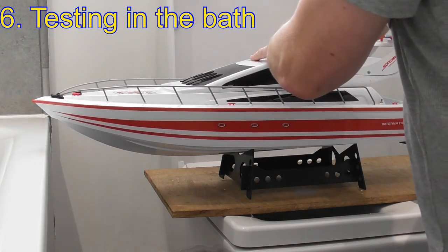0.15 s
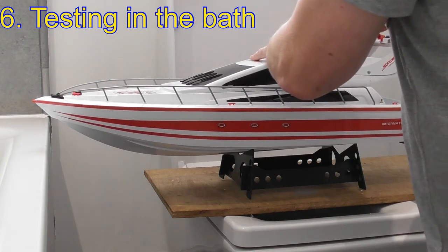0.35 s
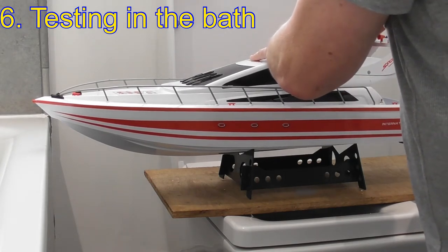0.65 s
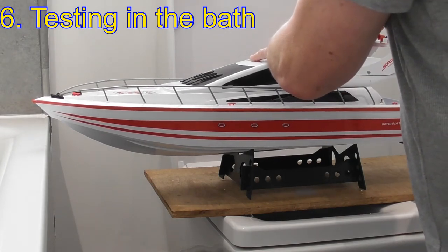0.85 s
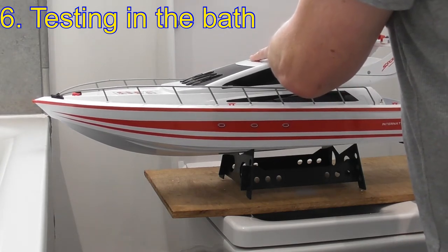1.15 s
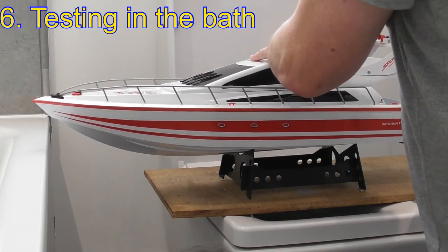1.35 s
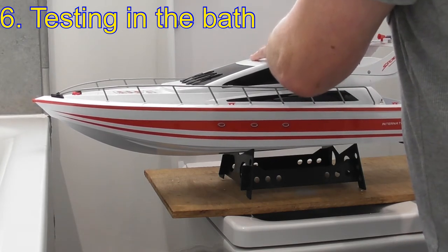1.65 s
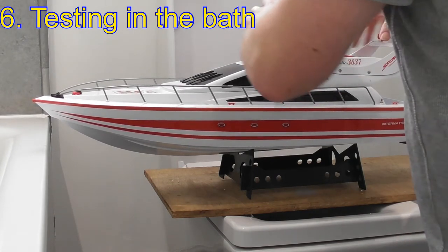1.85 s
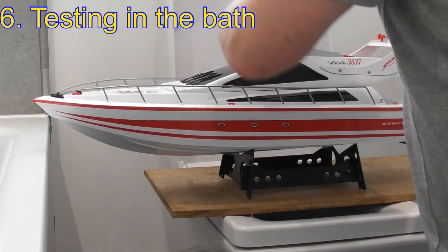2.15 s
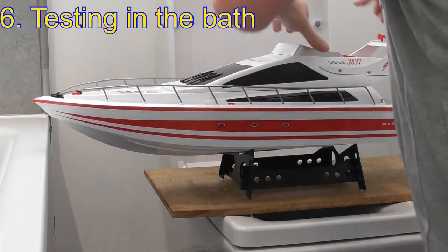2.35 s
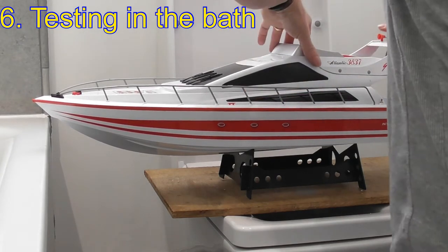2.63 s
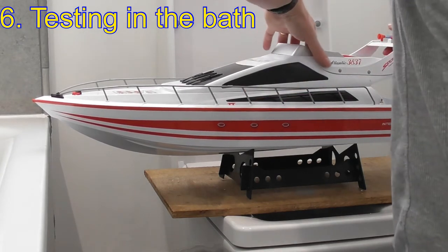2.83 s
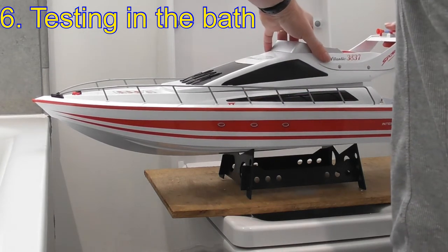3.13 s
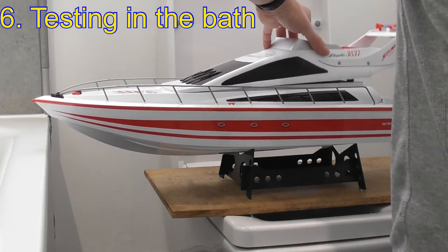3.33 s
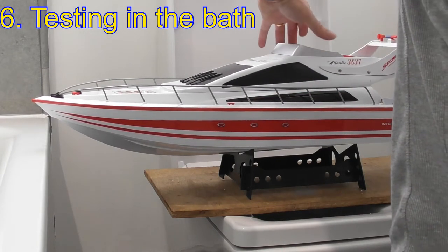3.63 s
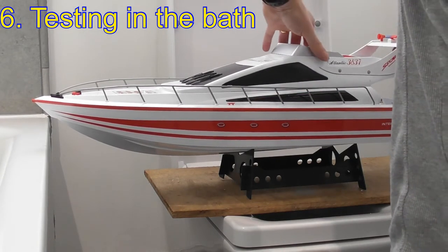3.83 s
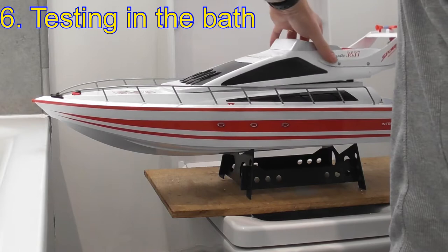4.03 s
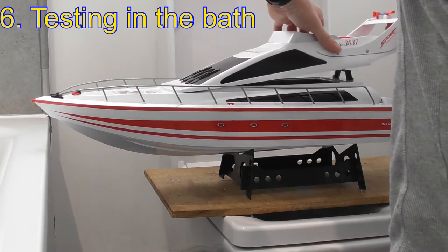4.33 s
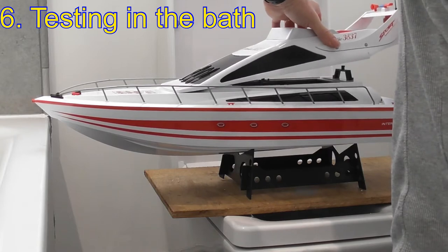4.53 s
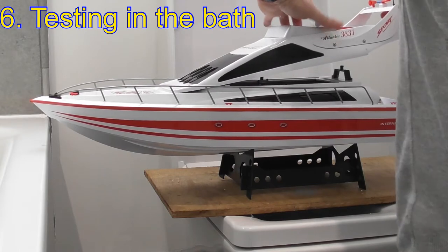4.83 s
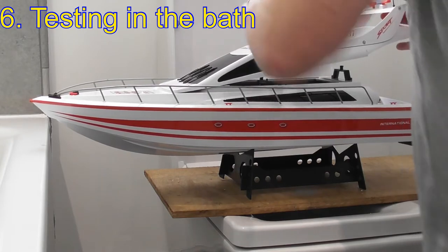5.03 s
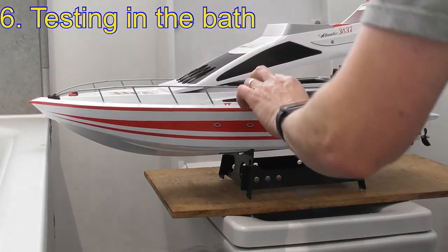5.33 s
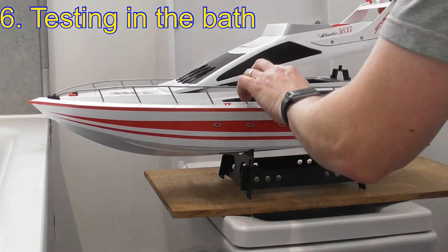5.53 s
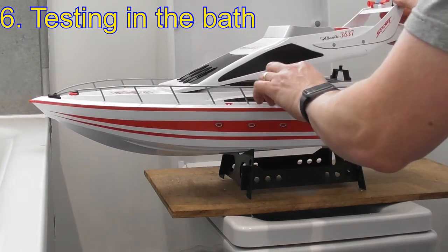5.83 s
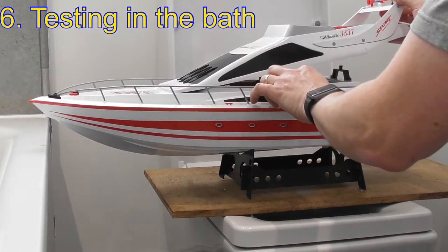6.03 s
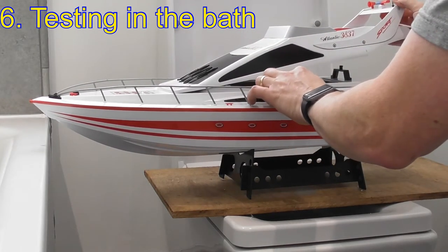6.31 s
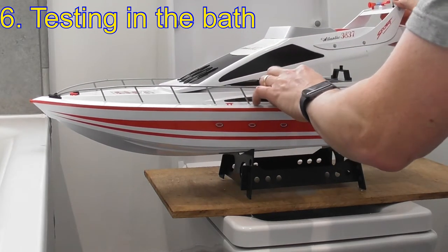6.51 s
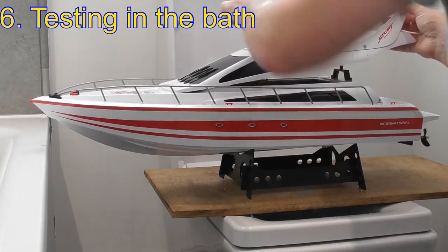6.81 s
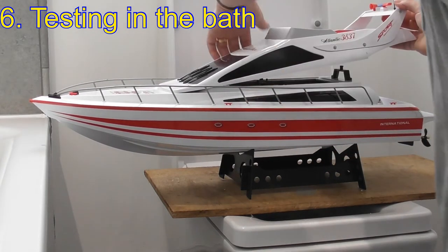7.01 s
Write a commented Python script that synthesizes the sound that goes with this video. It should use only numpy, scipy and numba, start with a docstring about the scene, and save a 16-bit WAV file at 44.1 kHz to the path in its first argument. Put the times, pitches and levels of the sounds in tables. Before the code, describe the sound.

A hollow plastic model boat is handled in a small tiled bathroom, about a metre from a stereo microphone, and every knock leaves a short ringing echo. A faint hum and hiss lie underneath. From the start, fingers brush the plastic lightly and scattered hollow knocks sound, clearer at about 0.1, 0.9, 1.2 and 2.5 seconds, with very faint finger squeaks around 2 seconds. Near 3 seconds the hum sinks. At about 3.4 seconds comes the loudest moment, a quick cluster of hard clunks as the cabin lifts. Lighter irregular knocks follow, and the hull drags softly on its stand from about 4.5 to 5.7 seconds, ending in a busier run with one strong clunk. Soft, low foot thumps occur now and then. At 6.3 seconds a plastic clip snaps, followed by two knocks near 6.6 seconds and another clunk around 7 seconds.

```python
"""A small tiled bathroom, a camera's stereo microphone a metre from a hollow plastic model boat.
Over a faint hum, fingers brush the plastic and start lifting the cabin off; knocks ring the shell and
the room's standing waves. Feet thump the floor, the hull drags on its stand, fingers squeak. Near 3 s
the hum sinks; the loudest knocks follow, held down by the camera's gain control. At 6.3 s a clip snaps."""
import sys
import numpy as np
from scipy import signal
from scipy.fft import rfft, irfft, next_fast_len
from scipy.io import wavfile
from numba import njit

SR = 44100
rng = np.random.default_rng(int(sys.argv[2]) if len(sys.argv) > 2 else 0)


def file_out(sig):
    """Save sig as 16-bit WAV at sys.argv[1]."""
    # one column per channel
    cols = np.atleast_2d(sig).T
    # limit, then scale
    lim = np.clip(cols, -1, 1)
    pcm = np.round(lim * 32767).astype(np.int16)
    wavfile.write(sys.argv[1], SR, pcm)


N = 315756
SIZE = next_fast_len(N + 2 * SR)  # leaves space for the room's tail
FREQ = np.arange(SIZE // 2 + 1) * SR / SIZE


def undb(db):
    """Decibels to gain."""
    return 10 ** (np.asarray(db) / 20)


def on_hz(table, hz):
    """Read (Hz, value) rows on a log-frequency axis."""
    freqs, values = np.transpose(sorted(table))
    return np.interp(np.log(hz + 1), np.log(freqs + 1), values)


def colour(x, table):
    """Shape a sound by (Hz, dB) rows."""
    hz = np.arange(len(x) // 2 + 1) * SR / len(x)
    return irfft(rfft(x) * undb(on_hz(table, hz)), len(x))


def level(x, db):
    """Set the rms level."""
    return x * undb(db) / np.sqrt(np.mean(x ** 2))


def resonate(x, hz, q):
    """Ring one resonance; a higher q rings longer."""
    return signal.lfilter(*signal.iirpeak(hz, q, SR), x)


def background():
    """A hum wavers and later sinks, over still air and microphone hiss."""
    # Hum tones. Each row: pitch in Hz, rms level in dB.
    tones = [(96.9, -63), (301.5, -60.5), (398.4, -51)]
    # Air and hiss. Each row: frequency in Hz, relative level in dB.
    air_spectrum = [(30, -9.5), (60, -3), (170, -14), (400, -5.5), (1000, -21), (2000, -29), (8000, -31),
                    (16000, -31)]
    waver_db, waver_hz = 1.5, 0.61
    sink_start_s, sink_length_s, sink_db = 2.8, 0.3, -7
    t = np.arange(SIZE) / SR
    hum = np.zeros(SIZE)
    for hz, db in tones:
        waver = waver_db * np.sin(2 * np.pi * (waver_hz * t + rng.random()))
        hum += np.sqrt(2) * undb(db + waver) * np.sin(2 * np.pi * hz * t)
    hum *= undb(sink_db * np.clip((t - sink_start_s) / sink_length_s, 0, 1))
    air, other_air = (level(colour(rng.standard_normal(SIZE), air_spectrum), db=-57) for _ in range(2))
    return microphone_ports(rfft(air + hum), rfft(other_air))


def brush():
    """Skin sticks and slips on the plastic: a dense spray of tiny clicks of uneven size."""
    # Sliding fingers. Each row: time in seconds, level in dB.
    strokes = [(0, -100), (.06, -81.5), (.8, -88), (1.9, -96), (2.1, -86.5), (2.35, -100), (2.5, -86),
               (3.1, -83), (3.29, -89), (3.4, -65), (3.5, -82), (3.7, -76), (4.3, -88.5), (5.3, -80.5),
               (5.6, -91), (6.0, -85.5), (6.901, -80.5), (7.16, -89)]
    times, db = np.transpose(strokes)
    clicks = (rng.random(N) < .06) * rng.standard_normal(N)
    clicks *= undb(1.6 * rng.exponential(size=N))
    clicks = colour(clicks, [(200, -17), (700, 24), (2000, 4.5), (4500, -1), (8000, -4)])
    return level(clicks, db=0) * undb(np.interp(np.arange(N) / SR, times, db))


def burst(t, length_s):
    """A cluster of slips: fading noise of even colour and unit energy."""
    fade = np.exp(-1.5 * t / length_s)
    noise = rng.standard_normal(len(t)) * fade
    for _ in range(3):
        flat_spectrum = np.exp(1j * np.angle(rfft(noise * fade)))
        noise = irfft(flat_spectrum) * (t < t[-1] / 2)
    noise *= np.sqrt(fade)
    return noise / np.sqrt(np.sum(noise ** 2))


def knock(thud_db, thud_tilt, crack_db, crack_tilt, contact_s):
    """One blow on plastic: a sharp crack, with the low tones smeared over the contact."""
    # A plain thud and a plain crack. Each row: frequency in Hz, relative band level in dB.
    thud_bands = [(160, -14), (330, -3), (850, 0), (1200, -5.5), (1500, -12.5)]
    crack_bands = [(2000, -4.5), (3900, -1.2), (7500, 0), (12500, -5)]
    thud_pivot_hz, crossover_hz, crack_pivot_hz = 397, 1500, 5020
    t = np.arange(4096) / SR
    hz = np.arange(len(t) // 2 + 1) * SR / len(t)
    crack_s = 0.0066 * 2 ** (-max(crack_tilt, 0) / 2.5)  # brighter cracks are shorter
    thud = signal.lfilter(*signal.butter(2, crossover_hz, fs=SR), burst(t, contact_s))
    crack = signal.lfilter(*signal.butter(2, crossover_hz, "high", fs=SR), burst(t, crack_s))
    phase = np.angle(rfft(thud + crack))
    bands = [(f, db + thud_db + thud_tilt * np.log2(f / thud_pivot_hz)) for f, db in thud_bands]
    bands += [(f, db + crack_db + crack_tilt * np.log2(f / crack_pivot_hz)) for f, db in crack_bands]
    density = [(f, db - 10 * np.log10(f / SR)) for f, db in bands]
    density += [(74.6, density[0][1] - 15)]  # the small hull radiates no deep bass
    log_gain = on_hz(density, hz) * np.log(10) / 20
    half = len(hz) - 2
    causal_fold = np.r_[1, 2 * np.ones(half), 1, np.zeros(half)]  # nothing sounds before the blow
    cepstrum = irfft(log_gain) * causal_fold
    return irfft(np.exp(1j * phase + rfft(cepstrum))) * (t < t[-1] / 2)


def shell(x):
    """The thin walls of hull and cabin add their modes."""
    # Each row: pitch in Hz, width in Hz, gain in dB.
    wall_modes = [(296, 31.5, -2), (461, 23, -5), (570, 31, -2.5), (630, 63, 1), (773, 21, -0.5),
                  (949, 36, -3), (1044, 41, -1.5), (1188, 42, -5), (2024, 150, 4.5), (2260, 450, 2.5)]
    return x + sum(undb(db) * resonate(x, hz, q=hz / width) for hz, width, db in wall_modes)


def knocks():
    """Three places on the boat, struck in turn; each blow also rings the air in the hull."""
    # Each row: start in seconds, thud level in dB, thud tilt in dB per octave,
    # crack level in dB, crack tilt in dB per octave, contact length in seconds.
    blows = [(0.057, -73, -14.5, -62.5, -4.5, 0.019), (0.141, -33, 7, -38.5, -1.2, 0.021),
             (0.556, -50, -3.5, -61.5, 1, 0.028), (0.934, -32, 3, -38.5, 3.8, 0.0079),
             (1.147, -42, 0, -67, 0.7, 0.016), (1.194, -26.5, 0.5, -45, -1.2, 0.022),
             (1.579, -46, -2.5, -58.5, -0.2, 0.0054), (1.633, -40, -0.5, -56, -0.5, 0.022),
             (1.686, -39.5, -0.6, -59.5, -0.5, 0.027), (2.24, -67, 0, -62.5, 3.5, 0.017),
             (2.329, -80, -1, -67, 7.5, 0.012), (2.542, -30, -1, -46, -0.1, 0.012),
             (2.639, -39, 0.4, -55, 2, 0.0026), (2.99, -43.4, 2.2, -56, 0, 0.024),
             (3.008, -61, 3, -61.5, 5.5, 0.011), (3.095, -34, -2.5, -69.5, -9, 0.013),
             (3.219, -44.5, -0.5, -79, -5, 0.013), (3.332, -43, 0.5, -56, 2.4, 0.02),
             (3.377, -47, 2, -45.5, 8, 0.0083), (3.411, -19, 0.2, -38.5, -2.5, 0.035),
             (3.432, -14.5, -0.5, -31, -1.7, 0.012), (3.454, -13.5, 1.5, -30, 0.7, 0.0142),
             (3.467, -23.5, 0.5, -35, 1.5, 0.012), (3.776, -42, 8, -48, 0.5, 0.016),
             (3.796, -32.8, -3, -48, -0.5, 0.022), (3.978, -31.5, 0, -47, -2, 0.015),
             (4.187, -44.5, 0.5, -55, 4.5, 0.034), (4.457, -38.5, 0.8, -54.5, -3, 0.042),
             (4.667, -46.5, 2.2, -75, -11, 0.031), (4.775, -40.5, 0.5, -48, -0.8, 0.026),
             (5.001, -37, 0.5, -46.5, 2.5, 0.0089), (5.227, -41, -1, -53, -1.5, 0.028),
             (5.322, -39.5, -5, -58.5, 3.5, 0.016), (5.367, -42.5, -1, -60.5, -5.5, 0.01),
             (5.501, -36, -1, -47, 2, 0.032), (5.617, -34.5, -0.8, -45.5, -0.2, 0.018),
             (5.674, -23, 0, -39.5, 1, 0.016), (5.745, -36.3, -2.3, -48.5, 0.5, 0.018),
             (5.794, -47, -4.5, -50, 2.5, 0.01), (6.241, -53, 0, -72, 14.5, 0.01),
             (6.325, -30, 0.2, -36, -3, 0.0092), (6.545, -28.5, -2.5, -38.1, -0.5, 0.016),
             (6.608, -31, 1, -44, 0.7, 0.013), (7.066, -30.5, 1, -40, 0.7, 0.035),
             (7.097, -39, 2, -49, 2, 0.017)]
    # Hull air, changing as the cabin lifts. Each row: time in seconds, pitch in Hz, gain in dB.
    hollow = [(0, 455, 7.5), (.9, 419, 14), (1.3, 424, -1), (1.7, 305, -9), (2.5, 366, 3.5),
              (3.2, 244, -20), (3.45, 377, -3), (4.0, 263, -8), (4.5, 310, -8), (5.7, 296, -3.5),
              (6.3, 650, 3.5), (7.16, 332, -21)]
    times, hollow_hz, hollow_db = np.transpose(hollow)
    places = np.zeros((3, N + SR))
    for k, (start_s, *blow) in enumerate(blows):
        hit = knock(*blow)
        ring = resonate(hit, np.interp(start_s, times, hollow_hz), q=1 / 0.12)
        ring *= undb(np.interp(start_s, times, hollow_db))
        start = int(start_s * SR)
        places[k % 3, start:start + len(hit)] += hit + ring
    return shell(places[:, :N])


def steps():
    """A soft heel pushes the floor down and lets it back."""
    # Each row: start in seconds, peak level in dB.
    footfalls = [(0.204, -74), (0.331, -76.5), (0.953, -76), (1.21, -82), (3.1, -73.5), (3.44, -72),
                 (5.081, -70), (5.36, -72), (5.848, -78.5), (6.329, -87)]
    push_s = 0.01
    push = np.sin(2 * np.pi * np.arange(int(push_s * SR)) / (push_s * SR))
    heels = np.zeros(N)
    for start_s, db in footfalls:
        heels[int(start_s * SR)] = undb(db)
    return np.convolve(heels, push)[:N]


def drag():
    """The hull creeps over its stand in soft uneven slips that stir its low modes."""
    # Each row: start in seconds, hold in seconds, level in dB before the shell rings.
    shifts = [(1.588, 0.034, -81.5), (3.063, 0.046, -74.5), (3.35, 0.21, -87), (4.562, 1.1, -80)]
    rise_db_per_s, fall_db_per_s = 115, 82
    t = np.arange(N) / SR
    slips = (rng.random(N) < .004) * rng.standard_normal(N)
    slips = colour(slips, [(80, -8), (170, 1), (300, -2), (700, 2.5), (1200, -21), (3000, -34)])
    push = np.zeros(N)
    for start_s, hold_s, db in shifts:
        before_s, after_s = np.maximum(start_s - t, 0), np.maximum(t - start_s - hold_s, 0)
        push += undb(db - rise_db_per_s * before_s - fall_db_per_s * after_s)
    return shell(level(slips, db=0)) * push


def squeaks():
    """Skin or plastic squeaks in thin rough tones that swell and fade."""
    # Each row: start in seconds, pitch in Hz, length in seconds, level at the source in dB.
    rubs = [(1.96, 1480, 0.2, -95), (2.236, 11400, 0.013, -72), (2.17, 1800, 0.25, -98),
            (2.329, 4470, 0.028, -97), (5.315, 8400, 0.013, -80)]
    out = np.zeros(N)
    for start_s, hz, length_s, db in rubs:
        start, n = int(start_s * SR), int(length_s * SR)
        tone = resonate(rng.standard_normal(SR // 2), hz, q=30)[-n:]
        out[start:start + n] += level(tone, db) * np.hanning(n)
    return out


def snap():
    """A clip springs home: one click into a short bright ring."""
    start_s, ring_hz, width_hz = 6.325, 3670, 2500
    click = undb(-35.5) * (np.arange(N) == int(start_s * SR))
    q = ring_hz / width_hz
    return resonate(resonate(click, ring_hz, q), ring_hz, q) * SR / width_hz


def room_echo():
    """One path through the tiled room: dense reflections fading band by band, and standing waves."""
    # Scattered reflections thin out in bass and top. Each row: frequency in Hz, gain in dB.
    diffuse = [(40, -14), (300, 0), (600, -1), (1200, 0.5), (8000, 1), (14000, -2.5)]
    # Each row: frequency in Hz, seconds to fade by 60 dB.
    decay_times = [(60, 1.), (250, 1), (1000, 0.97), (3000, 0.89), (8000, 0.52), (15000, 0.23)]
    # Each row: pitch in Hz, relative level in dB, seconds to fade by 60 dB.
    standing_waves = [(75.3, 7.5, 1.1), (94.7, 0.5, 0.8), (140.7, 1, 0.63), (169.8, 3.5, 0.48),
                      (224.9, 5.5, 0.83), (273.6, -0.5, 1.28), (296, 5, 0.86), (367, 2.5, 1.15),
                      (408.6, 1, 0.86), (461.6, -3, 0.89), (541, -1, 0.97), (621.5, -9.5, 1.2),
                      (730, -2, 1.1), (788, 2, 0.4)]
    early_db, early_s, build_s = 1, 0.0021, 0.0027
    t = np.arange(65536) / SR
    hz = np.arange(len(t) // 2 + 1) * SR / len(t)
    scatter = rfft(rng.standard_normal(len(t))) * undb(on_hz(diffuse, hz))
    echo = np.zeros(len(t))
    for octave in np.arange(5, 14.6, .5):
        band = np.clip(1 - 2 * np.abs(np.log2(hz + 1) - octave), 0, 1)
        echo += irfft(scatter * band) * undb(-60 * t / on_hz(decay_times, 2 ** octave))
    echo *= 1 + undb(early_db) * np.exp(-t / early_s)  # near surfaces answer first and loudest
    for wave_hz, db, t60 in standing_waves:
        phase, place = rng.random(2)
        strength = undb(db - 22.5 - 4 * place)  # the place in the room sets how hard a wave is driven
        echo += strength * np.sin(2 * np.pi * (wave_hz * t + phase)) * undb(-60 * t / t60)
    return echo * (1 - np.exp(-t / build_s))


def microphone_ports(common, unrelated):
    """Two close ports: the right hears the left's spectrum shifted in phase, plus an unrelated part."""
    # Each row: frequency in Hz, share of power common to both ports.
    likeness = [(30, 0.7), (60, 0.25), (130, 0.55), (290, 1), (640, 0.82), (1200, 0.68), (2000, 0.64),
                (3200, 0.97), (6500, 1), (8000, 0.99), (10000, 0.36), (15000, .2)]
    # Each row: frequency in Hz, the left's lead in radians.
    lead = [(30, 1), (60, 3.4), (130, 0.89), (500, 0.85), (1800, 0.55), (3500, 0.022), (8000, 0.018),
            (10000, 1.1), (11500, 1.7)]
    # Each row: frequency in Hz, left minus right in dB.
    balance = [(30, -1), (60, -8.5), (130, -5), (250, -5), (400, -3), (700, 0.4), (4000, 0), (8000, 0),
               (15000, 0.5)]
    share = on_hz(likeness, FREQ)
    lean = undb(on_hz(balance, FREQ) / 2)
    shifted = common * np.exp(-1j * on_hz(lead, FREQ))
    right = np.sqrt(share) * shifted + np.sqrt(1 - share) * unrelated
    return np.array([irfft(common * lean, SIZE)[:N], irfft(right / lean, SIZE)[:N]])


def scene():
    """Three places sound a metre from the microphone, each by its own path through the room."""
    # The straight path; treble beams at the camera. Each row: frequency in Hz, gain in dB.
    direct_path = [(300, 15), (1500, 16.5), (6000, 17.5), (12000, 23)]
    # The microphone's colour. Each row: frequency in Hz, gain in dB.
    mic_response = [(30, -12), (70, 1), (160, 5), (300, -0.5), (1200, -3.5), (1600, -2.5), (2900, -3),
                    (4000, 4), (5100, -3.5), (5900, 3), (6500, 1.5), (7500, 7), (10500, 4.5), (13000, 2),
                    (16000, -7)]
    direct, mic = undb(on_hz(direct_path, FREQ)), undb(on_hz(mic_response, FREQ))
    places = knocks()
    places[0] += steps() + snap()
    places[1] += brush() + squeaks()
    places[2] += drag()
    spectra = [rfft(place, SIZE) for place in places]
    direct_and_room = sum(spectrum * (rfft(room_echo(), SIZE) + direct) for spectrum in spectra)
    room_only = sum(spectrum * rfft(room_echo(), SIZE) for spectrum in spectra)
    return microphone_ports(direct_and_room * mic, room_only * mic) + background()


@njit
def follow(x, attack, release):
    """Envelope that rises fast and falls slowly."""
    out, envelope = np.empty(len(x)), 0.
    for i in range(len(x)):
        envelope += (x[i] - envelope) * (attack if x[i] > envelope else release)
        out[i] = envelope
    return out


def record(dry):
    """The camera's gain control turns down whatever passes the threshold; the top is cut."""
    threshold_db, ratio, attack_s, release_s = -20.5, 1.532, 0.0019, 0.029
    top_hz = 15900
    envelope = follow(np.abs(dry).max(axis=0), 1 / (attack_s * SR), 1 / (release_s * SR))
    gain = np.minimum(1, undb(threshold_db) / (envelope + 1e-9)) ** (1 - 1 / ratio)
    lowpass = signal.ellip(10, .2, 60, top_hz, fs=SR, output="sos")
    return signal.sosfilt(lowpass, dry * gain)


dry = scene()
out = record(dry)
file_out(out)
```